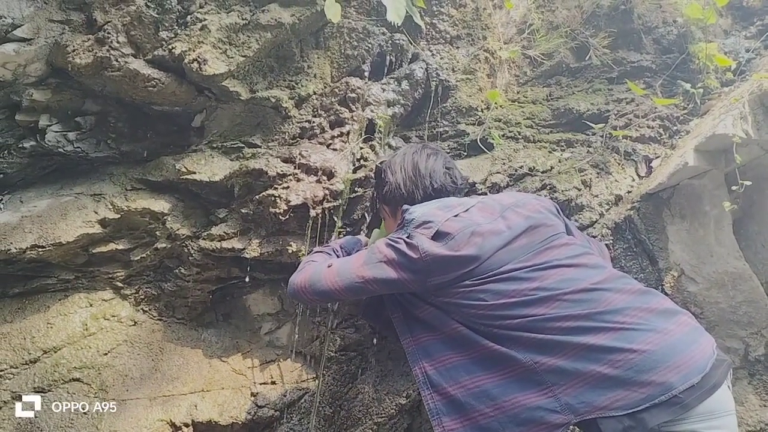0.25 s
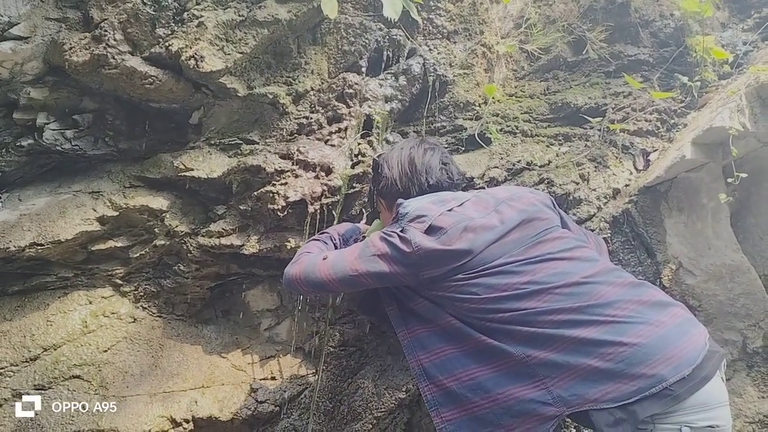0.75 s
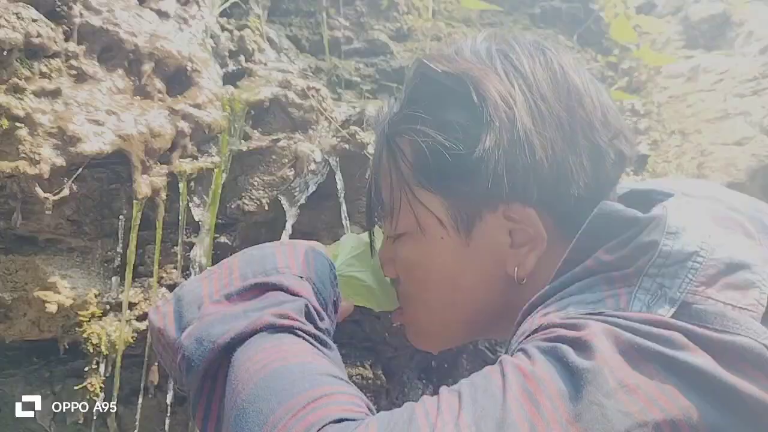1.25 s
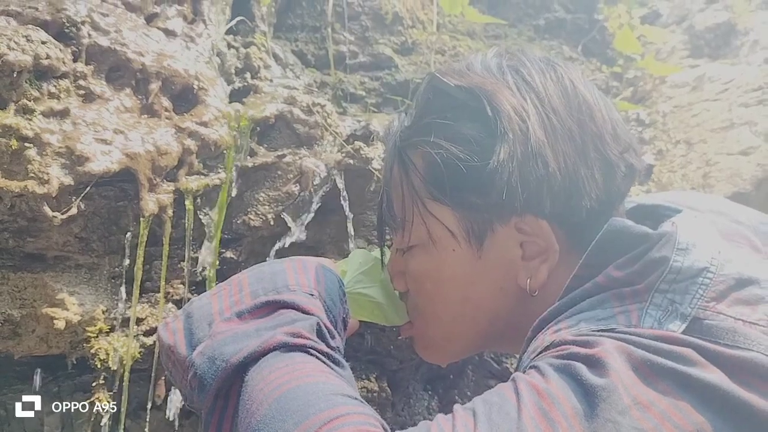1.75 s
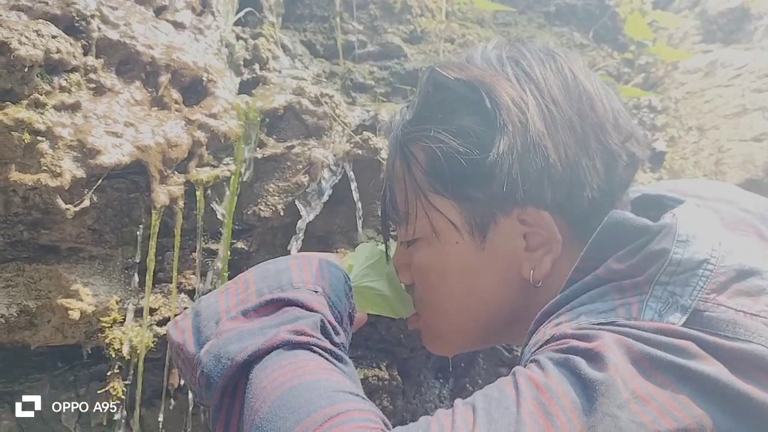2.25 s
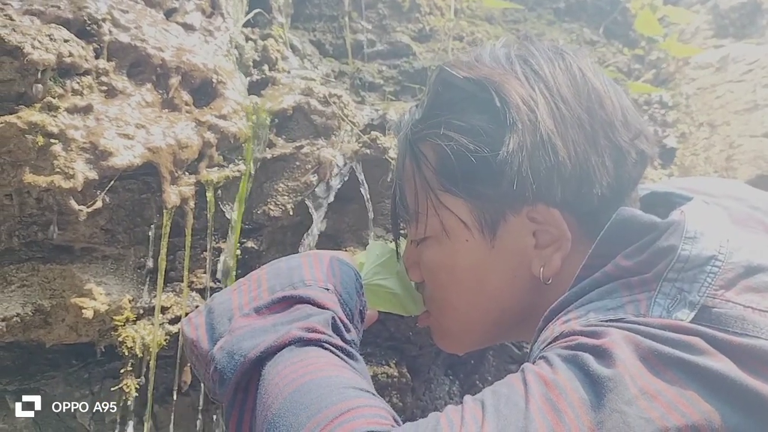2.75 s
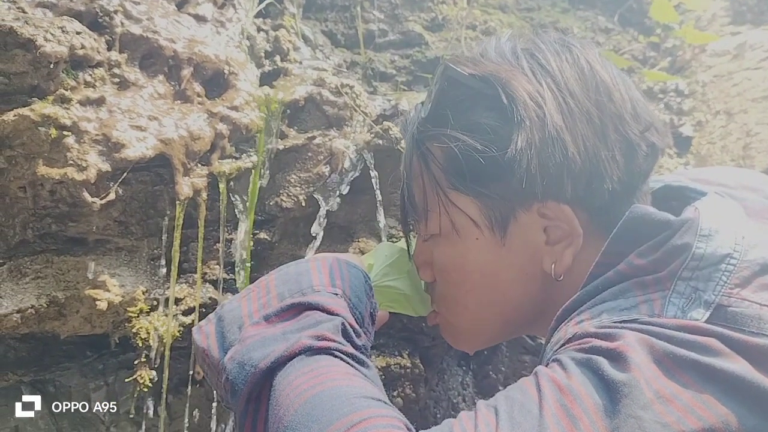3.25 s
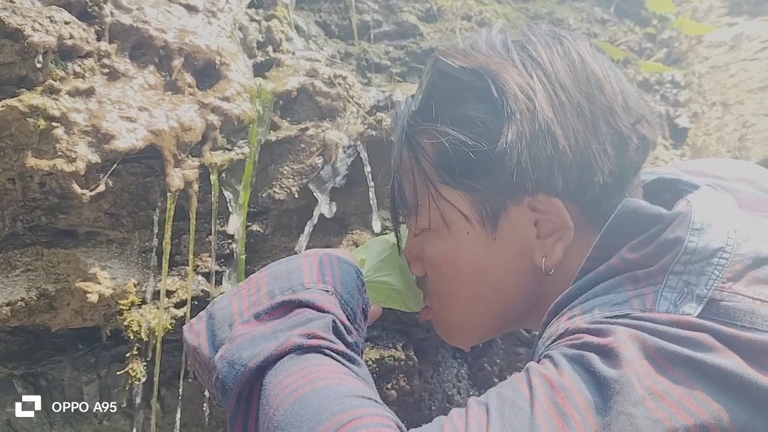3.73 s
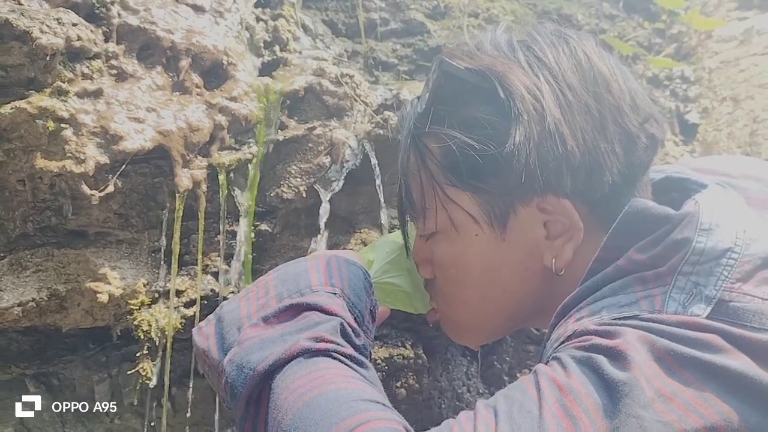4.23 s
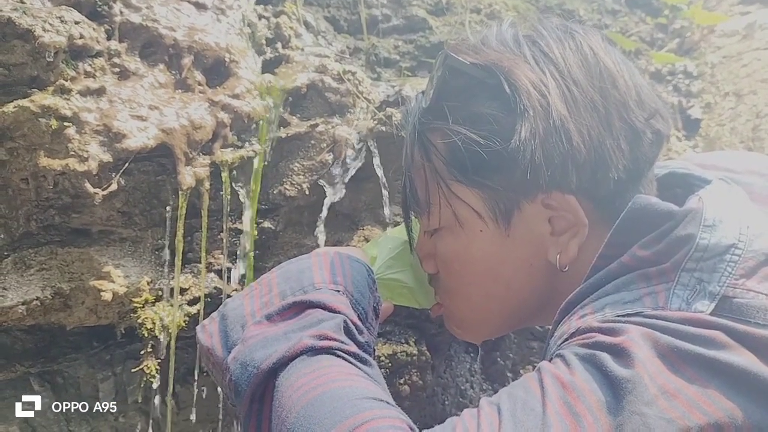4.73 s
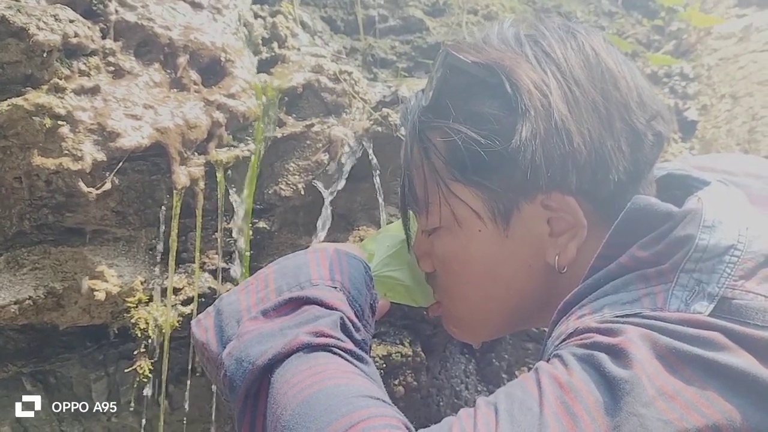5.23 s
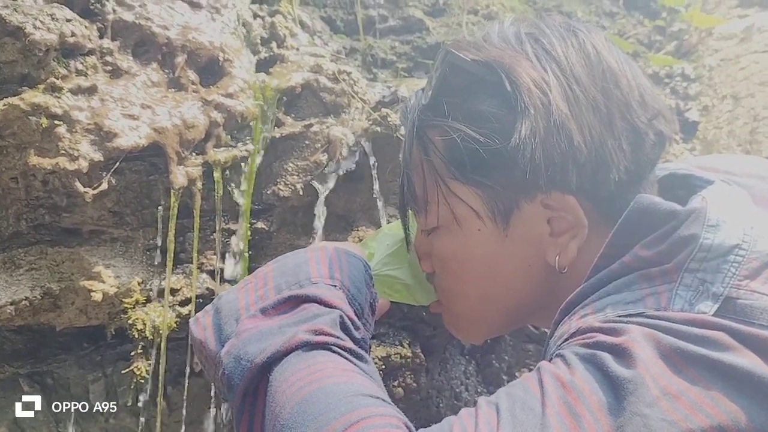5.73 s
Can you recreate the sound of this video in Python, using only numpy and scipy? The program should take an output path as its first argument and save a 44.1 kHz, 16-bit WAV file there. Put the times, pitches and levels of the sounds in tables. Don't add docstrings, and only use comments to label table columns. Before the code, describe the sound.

A small trickle runs down a rock face outdoors, heard from a few steps away as a soft, steady, hissy patter, with a few light high drops, clearest around 0.8 and 1.06 seconds. At about 1.2 seconds it fades fast, and from 1.3 to 1.8 there is complete silence. The water then returns abruptly and close, opening with a brief gush, low slosh and hard splat, easing by 2.05 into a steadier patter with a slight swell near 2.35. Irregular drops stand out: heavy wet splats near 2.2, 2.9, 3.27, 5.62 and 5.79, and frequent lighter ticks on a leaf, all near one high pitch. Fine spray, tiny rising bubble chirps, most crowded early, and a wavering hum from a rock cleft fill the background. Reflections are short and close; the phone microphone dulls the highest treble. It continues to the end, near 6 seconds.

```python
import sys
import numpy as np
from scipy import signal
from scipy.fft import rfft, irfft
from scipy.io import wavfile

SR = 44100
rng = np.random.default_rng(int(sys.argv[2]) if len(sys.argv) > 2 else 0)


def bounce(signal):
    frames = np.transpose(np.atleast_2d(signal))
    limited = np.clip(frames, -1, 1)
    pcm = np.round(limited * 32767).astype(np.int16)
    wavfile.write(sys.argv[1], SR, pcm)


def magnitude_from_level(level_db):
    exponent = np.asarray(level_db, float) / 20
    return 10 ** exponent


N = 263718

RESUME_S = 1.8195
BURST = 3000
SPLASHED_DB = -26

# start_s, peak_db, main_ring_hz, second_ring_hz
HEAVY_DROPS = [(1.8268, -26, 3650, 3870), (1.8374, -14.5, 3510, 4570), (1.8774, -24, 3900, 4920),
               (1.916, -28, 3470, 3870), (1.928, -27, 2740, 4900), (1.9814, -26, 5840, 4140),
               (2.1932, -30, 2540, 4350), (2.1998, -15.5, 4300, 3560), (2.3538, -28, 4170, 5620),
               (2.7916, -27, 2800, 3900), (2.8895, -14.5, 3630, 3640), (2.8992, -17, 3620, 3500),
               (3.054, -28, 3340, 4360), (3.0644, -23, 3500, 3960), (3.1338, -24, 3380, 3900),
               (3.2132, -27.5, 2640, 4040), (3.2719, -22.5, 4250, 3270), (3.2939, -29.5, 2650, 3900),
               (4.0612, -27, 4420, 5260), (4.0866, -27, 2890, 4000), (4.1478, -27, 2640, 3770),
               (4.167, -25, 3900, 2870), (5.167, -26.5, 3170, 3700), (5.201, -31, 2840, 4130),
               (5.309, -30, 3630, 4100), (5.3852, -30, 2690, 3900), (5.6156, -18.5, 3400, 3720),
               (5.7903, -15, 2930, 4060), (5.7974, -25, 2780, 4160), (5.9261, -28, 3570, 5040)]


def rms_one(x):
    return x / np.sqrt(np.mean(x ** 2) + 1e-20)


def peak_one(x):
    return x / np.abs(x).max()


def drift(rate):
    step = 40
    r = np.exp(-2 * np.pi * rate * step / SR)
    noise = rng.standard_normal(N // step + 1002)
    slow = signal.lfilter([1], [1, -2 * r, r * r], noise)[1000:]
    return np.interp(np.arange(N) / step, np.arange(len(slow)), rms_one(slow))


def resonance(x, hz, width_hz):
    r = np.exp(-np.pi * width_hz / SR)
    turn = 2 * np.pi * hz / SR
    return signal.lfilter([(1 - r * r) / 2, 0, (r * r - 1) / 2], [1, -2 * r * np.cos(turn), r * r], x)


def double_ring(x, hz, width_hz):
    return resonance(resonance(x, hz, width_hz), hz, width_hz)


def band(x, low_hz, high_hz):
    return signal.sosfilt(signal.butter(2, [low_hz, high_hz], "band", fs=SR, output="sos"), x)


def shape(spectrum, points, top_hz):
    hz = np.clip(np.arange(N // 2 + 1) * SR / N, 1, top_hz)
    points = np.array(points)
    return spectrum * magnitude_from_level(np.interp(np.log(hz), np.log(points[:, 0]), points[:, 1]))


def add(out, s, sound, db):
    at = int(s * SR)
    out[at:at + len(sound)] += (magnitude_from_level(db) * peak_one(sound))[:N - at]


def droplets(per_s, spread_db, smear_s):
    size_db = 2 * spread_db * np.minimum(rng.exponential(1, N), 3)
    hits = (rng.random(N) < per_s / SR) * magnitude_from_level(size_db)
    r = np.exp(-1 / (smear_s * SR))
    strength = np.sqrt(signal.lfilter([1], [1, -r], hits + 1e-18))
    grains = strength * rng.standard_normal(N)
    return band(rms_one(grains), low_hz=1540, high_hz=19400)


def patter(flow, colour, deep_db, grain_db, patchy_db, per_s, spread_db):
    treble_lag = .35
    start_s, flow_db = np.transpose(flow)
    level_db = np.interp(np.arange(N) / SR, start_s, flow_db)
    source = rng.standard_normal(N) + magnitude_from_level(grain_db) * droplets(per_s, spread_db, smear_s=0.0031)
    spectrum = shape(rfft(source), colour, 6900)
    hz = np.arange(1, N // 2 + 2) * SR / N
    middle = irfft(spectrum * (hz > 1800) * (hz < 4500), N)
    spectrum /= np.sqrt(np.mean(middle ** 2))
    out = 0
    together = drift(6.0)
    place = np.clip(2 * np.log2(hz / 90), 0, 15)
    for k in range(16):
        tilt_db = (k < 9) * deep_db + (k > 11) * treble_lag * (level_db[-1] - level_db)
        flicker_db = patchy_db * (1.2 * together + drift(40.0))
        one_band = irfft(spectrum * np.clip(1 - abs(place - k), 0, 1), N)
        out = out + magnitude_from_level(tilt_db + flicker_db) * one_band
    return magnitude_from_level(level_db) * out


def puffs(count, strike):
    uneven_db = 2.5 * rng.standard_normal((count, BURST // 30)).repeat(30, axis=1)
    crackle = rng.standard_normal((count, BURST)) * magnitude_from_level(uneven_db)
    crackle[:, 30] += strike
    return crackle


def dying(t60, rise_s):
    t = np.arange(BURST) / SR
    rise = (1 - np.exp(-t / max(rise_s, .0002))) ** 2
    return rise * magnitude_from_level(-60 * t / max(t60, .005))


def ticks(table):
    out = np.zeros(N)
    for (s, db, hz), puff in zip(table, puffs(len(table), strike=7.0)):
        puff = puff * dying(t60=.028, rise_s=0.00052)
        ring = double_ring(puff, hz, width_hz=730)
        slap = band(band(puff, low_hz=3900, high_hz=7260), low_hz=3400, high_hz=7560)
        add(out, s - .0007, ring + magnitude_from_level(-3) * slap, db - 1.0)
    return out


def splats():
    # start_s, peak_db, main_ring_hz, second_ring_hz, t60_s
    deep_drops = [
        (2.2, -21.5, 2600, 3020, 0.026),
        (2.895, -22.5, 2630, 3080, 0.077),
        (3.272, -26.5, 3640, 2840, 0.037),
        (5.618, -22.5, 2580, 2850, 0.058),
        (5.791, -20, 2480, 3150, 0.07),
        (2.31, -32, 2560, 3320, 0.13),
        (2.335, -27, 2970, 3520, 0.086),
    ]
    drops = [(*row, .026) for row in HEAVY_DROPS] + deep_drops
    out = np.zeros(N)
    for (s, db, hz, second_hz, t60), puff in zip(drops, puffs(len(drops), strike=18.0)):
        puff = puff * dying(t60, rise_s=0.00072)
        main = peak_one(double_ring(puff, hz, width_hz=460))
        second = peak_one(double_ring(puff, second_hz, width_hz=300))
        slap = peak_one(band(band(puff, low_hz=2420, high_hz=4600), low_hz=2160, high_hz=5030))
        add(out, s - .0007, main + magnitude_from_level(-5) * second + magnitude_from_level(-12) * slap, db)
    return out


def light_drops(count):
    # start_s, peak_db
    leaf_drips = [(2.0438, -24.5), (2.0536, -26), (2.4095, -24.5), (2.426, -25), (2.6165, -25),
                  (2.8779, -28.5), (2.9767, -29.5), (2.9907, -24), (3.0545, -24.5), (3.2511, -30),
                  (3.4472, -23), (3.4676, -26.5), (3.5225, -29), (3.7614, -30), (4.0613, -24.5),
                  (4.2019, -25.5), (4.3735, -23.5), (4.4794, -27.5), (4.5033, -27), (4.5447, -24),
                  (4.6489, -26.5), (4.7193, -22), (4.9018, -29), (5.0286, -27), (5.3094, -28.5),
                  (5.4052, -24), (5.5155, -27.5), (5.6521, -24), (5.8083, -27), (5.9265, -27.5)]
    # start_s, peak_db, ring_hz
    other_drops = [(1.8786, -20, 6360), (1.8978, -29.5, 5660), (1.9288, -20.5, 6000), (2.1311, -32.5, 6740),
                   (2.2005, -19.5, 5100), (2.3539, -17.5, 4600), (2.3541, -16.5, 7300),
                   (2.4629, -29.5, 6800), (2.6619, -24.5, 5500), (2.7338, -24, 4770), (2.759, -29.5, 5050),
                   (2.8969, -18, 6560), (3.0122, -29.5, 6600), (3.5608, -28, 7040), (3.579, -31, 6260),
                   (3.65, -32, 7000), (3.7475, -28.5, 5400), (4.1695, -18, 5600), (4.299, -28.5, 5470),
                   (4.411, -23, 6250), (4.4942, -28, 4560), (5.0543, -30, 6260), (5.2198, -33, 5200),
                   (5.257, -23, 6100), (5.3721, -34, 5800), (5.5589, -23.5, 6350), (5.5783, -28.5, 6840),
                   (5.6952, -30, 6100), (5.7434, -28.5, 5200), (5.8461, -26, 5800)]
    leaf_hz, leaf_spread_hz = 5850, 33
    rebound_s = .0245
    faint_db, faint_spread_db = -34, 3.0
    heavy_s = np.array(HEAVY_DROPS)[:, 0]
    splashing_s = heavy_s[np.diff(heavy_s, prepend=0) > rebound_s]
    leaf = leaf_drips + [(s, SPLASHED_DB) for s in splashing_s]
    leaf = [(s, db, leaf_hz + leaf_spread_hz * rng.standard_normal()) for s, db in leaf]
    when, size, pitch = rng.random((count, 3)).T
    stray_s = RESUME_S + when * (N / SR - RESUME_S)
    stray_db = faint_db + faint_spread_db * (2 * size - 1)
    return leaf + other_drops + list(zip(stray_s, stray_db, 4600 + 2400 * pitch))


def spray(drops):
    # start_s, peak_db
    strong_bursts = [(1.856, -35.5), (1.984, -38), (2.0059, -40.5), (2.3544, -34.5), (2.41, -38.5),
                     (2.4598, -37.5), (2.5894, -36), (2.6614, -44.5), (2.9005, -47), (2.9777, -41),
                     (3.2282, -44.5), (3.2927, -38.5), (3.461, -41), (3.524, -46.5), (3.5784, -44.5),
                     (3.8372, -43.5), (3.933, -45), (4.0623, -41), (4.1298, -41), (4.2362, -43.5),
                     (4.383, -40.5), (4.5043, -43), (4.5496, -41.5), (4.8667, -43.5), (4.9427, -39.5),
                     (5.0824, -39), (5.3882, -37.5), (5.6162, -48), (5.7247, -38.5), (5.7903, -43)]
    mist = [(s, -46.5 + 0.26 * (db - SPLASHED_DB)) for s, db, _ in drops]
    bursts = strong_bursts + mist
    out = np.zeros(N)
    for (s, db), puff in zip(bursts, puffs(len(bursts), strike=.1)):
        hiss = band(puff * dying(t60=0.028, rise_s=0.0011), low_hz=8600, high_hz=16900)
        add(out, s - .0005, hiss, db + 18)
    return out


def rock_echo(x):
    out = x.copy()
    for lag_s, db in [(.0043, -9), (.0095, -11.5), (.0165, -13)]:
        lag = int(lag_s * SR)
        out[lag:] += magnitude_from_level(db) * x[:-lag]
    return out


def plops():
    # start_s, peak_db, pitch_hz, t60_s
    sloshes = [(1.86, -27, 230, 0.047), (1.871, -25, 1290, 0.023), (2.049, -32, 2520, 0.25),
               (2.129, -36.5, 1100, 0.26), (2.139, -30.5, 2500, 0.069), (2.181, -52, 1050, .12),
               (2.289, -42, 1050, 0.11), (2.305, -30.5, 1320, 0.12), (2.399, -42.5, 251, 0.098),
               (2.45, -40, 885, 0.18), (2.979, -39, 1290, 0.056), (3.509, -35.5, 1230, 0.065),
               (4.217, -32.5, 1320, 0.032), (5.145, -37, 265, .16), (5.151, -42, 190, 0.083),
               (5.51, -37, 1040, 0.069), (5.718, -40, 294, 0.055)]
    out = np.zeros(N)
    for (s, db, hz, t60), puff in zip(sloshes, puffs(len(sloshes), strike=0)):
        push = puff * dying(t60, rise_s=0.97 / hz)
        add(out, s, double_ring(push, hz, width_hz=30 + 0.13 * hz), db)
    return out


def gurgle(count, db):
    out, t = np.zeros(N), np.arange(BURST) / SR
    for when, pitch, size in rng.random((count, 3)):
        hz = 950 * 3.6 ** pitch
        t60 = 60.0 / hz
        bubble = np.sin(2 * np.pi * hz * (t + 0.26 * t ** 2 / t60)) * dying(t60, rise_s=3.9 / hz)
        s = RESUME_S + when ** 2.2 * (N / SR - RESUME_S)
        add(out, s, bubble, db + 8.0 * size)
    return out


def scene():
    # start_s, level_db
    far_flow = [
        (0, -37),
        (.75, -37),
        (1.3, -36.5),
    ]
    near_flow = [
        (1.82, -34),
        (1.99, -34.5),
        (2.04, -41.5),
        (2.2, -40),
        (2.36, -38),
        (2.5, -40.5),
        (4.0, -41),
        (5.98, -40.5),
    ]
    # pitch_hz, level_db (per Hz)
    far_colour = [(24, -76.5), (40, -40), (194, -8.5), (340, -9), (379, -16.5), (460, -7.5), (620, -13),
                  (700, -9.5), (1950, -10.5), (2450, -2), (3000, -1.5), (3900, -4.5), (4540, -11.5),
                  (5760, -9.5), (7000, -14)]
    near_colour = [(24, -57), (40, -30.5), (126, -7.5), (186, -8.5), (268, 0.5), (370, -6), (535, -2.5),
                   (596, -5), (1190, -3), (1960, -7.5), (2540, 0), (3990, -6), (4640, -12), (7000, -9.5),
                   (9100, -39), (15400, -120)]
    # start_s, peak_db, ring_hz
    far_drops = [(.1436, -31.5, 5180), (.2823, -31, 4520), (.3855, -37, 4330), (.4444, -37, 5080),
                 (.5157, -29.5, 6280), (.7657, -28.5, 5770), (.8096, -23, 4950), (1.0066, -32.5, 5670),
                 (1.061, -21.5, 5700), (1.0874, -30, 4960)]
    far = patter(far_flow, far_colour, deep_db=1.0, grain_db=-17.0, patchy_db=1.1, per_s=460, spread_db=12.0)
    far = far + magnitude_from_level(-1.5) * ticks(far_drops)
    near = patter(near_flow, near_colour, deep_db=-0.63, grain_db=-5, patchy_db=0.54, per_s=200, spread_db=5.0)
    near = near + magnitude_from_level(-9 + 5.0 * drift(9.0)) * resonance(near, hz=2520, width_hz=120)
    drops = light_drops(count=45)
    near = near + rock_echo(splats() + ticks(drops) + spray(drops))
    near = near + plops() + gurgle(count=220, db=-50.5)
    return np.where(np.arange(N) / SR < 1.5, far, near)[None]


def band_limit(x):
    return signal.sosfilt(signal.butter(12, 16350, fs=SR, output="sos"), x)


def record(dry):
    # pitch_hz, gain_db
    microphone = [(6900, 0), (7500, -5), (8500, -15.5), (9400, -25.5), (10000, -25.5), (11100, -23.5),
                  (11600, -19), (12000, -11), (12700, -20.5), (13400, -17.5), (14100, -18), (14900, -19),
                  (15500, -21.5)]
    top_hz = 15530
    fade_s, fade_db_per_s, pause_s = 1.195, -185, 1.2995
    spectrum = shape(rfft(dry), microphone, top_hz)
    heard = irfft(spectrum * (np.arange(N // 2 + 1) * SR / N < top_hz), N)
    t = np.arange(N) / SR
    fade = magnitude_from_level(fade_db_per_s * np.clip(t - fade_s, 0, 1))
    gate = fade * (t < pause_s) + (t > RESUME_S)
    return band_limit(heard * gate)


dry = scene()
out = record(dry)
bounce(out)
```